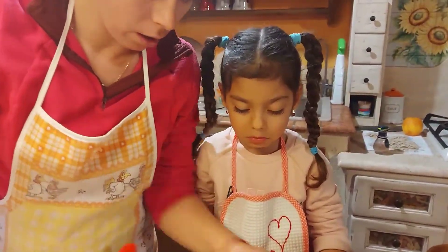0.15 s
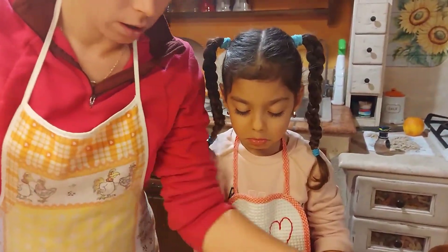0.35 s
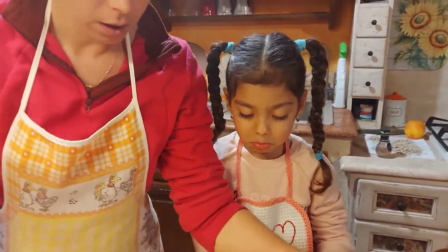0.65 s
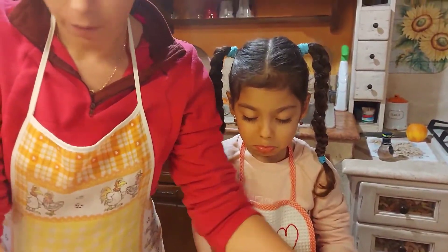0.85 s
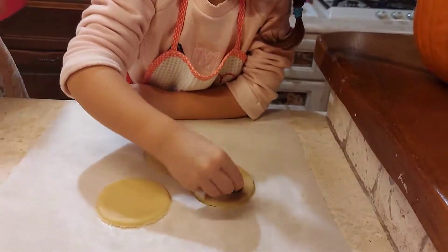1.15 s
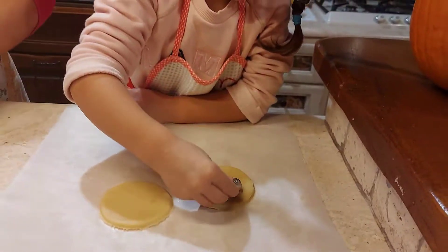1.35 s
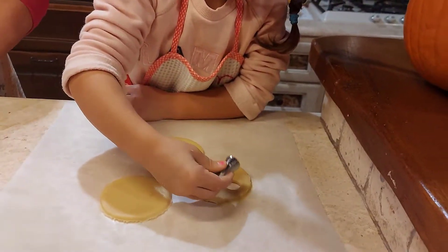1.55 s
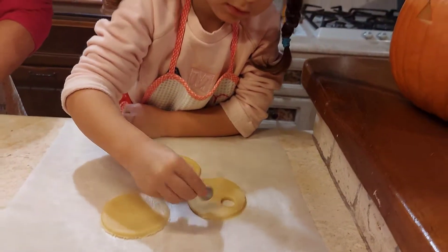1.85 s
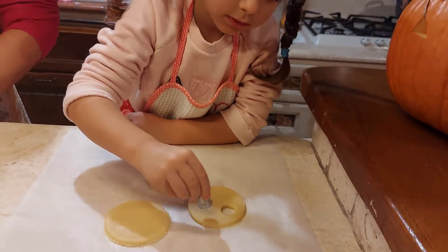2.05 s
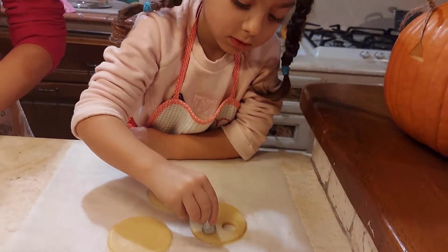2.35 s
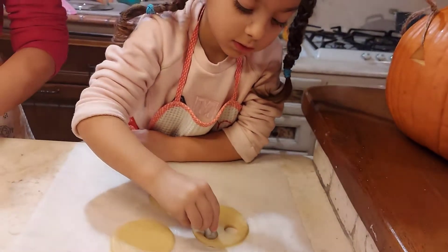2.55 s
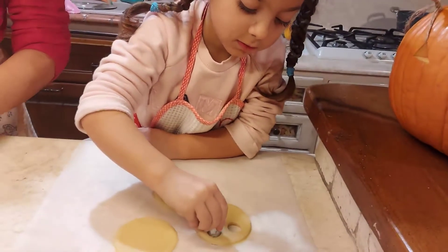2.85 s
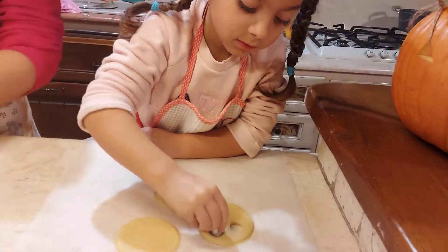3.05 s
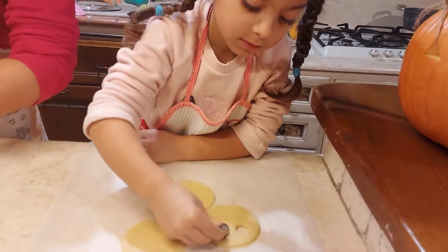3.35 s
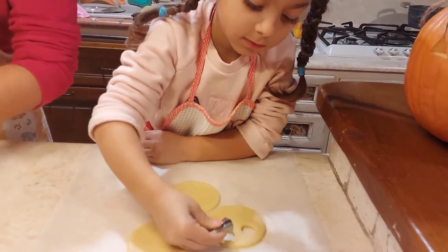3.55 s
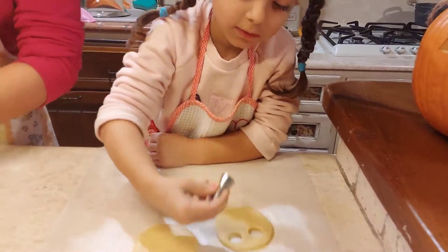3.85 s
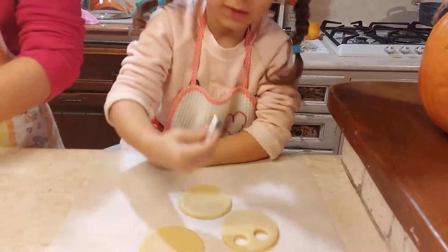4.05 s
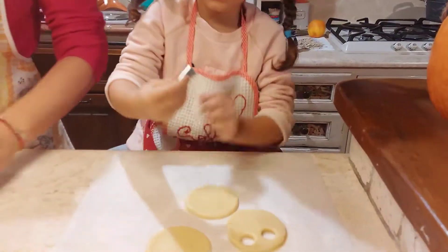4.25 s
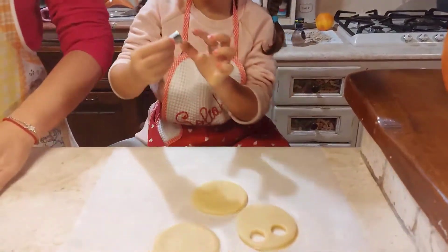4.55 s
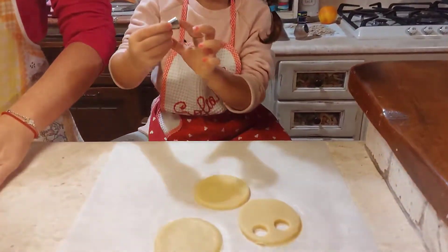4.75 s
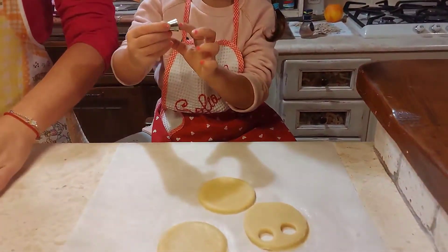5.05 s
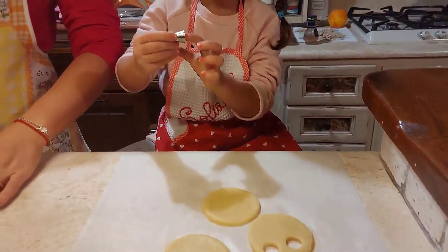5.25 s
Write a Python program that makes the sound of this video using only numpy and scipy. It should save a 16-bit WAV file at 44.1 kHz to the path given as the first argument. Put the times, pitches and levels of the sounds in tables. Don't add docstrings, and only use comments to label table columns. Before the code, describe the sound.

A quiet indoor kitchen with a low appliance hum and faint hiss, heard close in stereo with a short room ring. A soft touch at 0.37 s precedes a loud, hard, bouncing knock at 0.49 s with a counter thud and brief paper scrape. From 0.6 to 1.3 s baking paper slides loudly, bright and hissy, with dense sharp crackles strongest around 0.75 and 0.92 s, a dry drone near 1.25 s and creaking board. At 1.33 s it cuts suddenly to a softer scene: a dull push at 1.4 s, tiny hard taps from 1.5 to 1.9 s, and crisp rustles around 1.9-2.2 s. It is nearly still until 2.9 s, when low bumps begin, firmer near 3.45 s. Short paper sweeps come at 3.5, 3.8 and 4.0 s, a quiet knock at 4.18 s, rustling and a thump around 4.45 s, a snap at 4.6 s, then small ticks and another low push near 4.9 s.

```python
import sys
import numpy as np
from scipy import signal
from scipy.fft import rfft, irfft
from scipy.io import wavfile
from scipy.ndimage import uniform_filter1d

SR = 44100
rng = np.random.default_rng(int(sys.argv[2]) if len(sys.argv) > 2 else 0)


def attenuation_scalar(level_db):
    decades = np.asarray(level_db, float) / 20
    return 10 ** decades


def to_wav(sig):
    pcm = np.clip(np.atleast_2d(sig), -1, 1) * 32767
    pcm = np.round(pcm).astype(np.int16)
    wavfile.write(sys.argv[1], SR, pcm.T)


N = 237875
T = np.arange(N) / SR
SCENE_CHANGE_S = 1.328
STEP = 16

# pitch_hz, level_db per Hz
KITCHEN_SPECTRUM = [(15, -50.5), (25, -38), (86, -13), (134, -11.5), (167, 4), (189, -15), (220, -10.5),
                    (253, -15.5), (282, -5.5), (428, -19), (492, -30), (556, -16.5), (1000, -55),
                    (1300, -80), (2200, -120)]
# pitch_hz, level_db
APPLIANCE_TONES = [(755, -90), (513, -95)]
# pitch_hz, level_db per Hz
MIC_SPECTRUM = [(530, -33), (900, -8), (1260, -14), (1440, -10.5), (6990, -20), (12400, -8.5),
                (15800, -15.5)]
# pitch_hz, likeness (0 to 1)
LEFT_RIGHT_LIKENESS = [(25, .9), (60, .985), (150, .985), (300, .75), (600, .35), (1200, .3), (2500, .25),
                       (15000, .2)]
# pitch_hz, time_to_fall_60db_s
ROOM_DECAY = [(100, 0.13), (1000, .4), (4000, 0.23), (15000, 0.25)]

# pitch_hz, level_db per Hz
RUMBLE_SPECTRUM = [(55, -25.5), (85, -12), (105, -9), (123, -1), (142, -12), (165, -11), (220, -17),
                   (290, -17), (390, -22), (520, -22.5), (800, -43.5)]
# pitch_hz, level_db per Hz
FLOOR_SPECTRUM = [(18, -33.5), (33, -15), (55, -1), (75, -2), (100, -25)]
# pitch_hz, level_db per Hz
CREAK_SPECTRUM = [(400, -23), (600, -9.5), (720, 0.5), (830, -4.5), (960, -8.5), (1120, -10), (1500, -31)]
# peak_s, rumble_db, creak_db, floor_thud_db, fall_20db_s
LEAN_EVENTS = [(.094, -48, -90, -79, -0.07), (.32, -59, -83, -79, 0.04), (.43, -44, -54, -67, 0.14),
               (0.789, -42.5, -43, -70, 0.13), (.88, -55, -69, -64, .3), (1.12, -50, -52, -72, 0.44),
               (1.24, -46.5, -57, -70, 0.02), (1.28, -51, -44, -69, 0.14), (1.37, -56.5, -62, -90, 0.23),
               (1.528, -57, -52, -82, 0.09), (1.721, -68, -52.5, -90, 0.2),
               (1.919, -53.5, -45, -83, 0.0858), (2.06, -54.5, -51, -77, .11), (2.46, -70, -97, -88, 0.5),
               (2.95, -61, -99, -51, 0.03), (3.12, -56.5, -77.5, -76, 0.56), (3.37, -52.5, -55, -63, 0.13),
               (3.47, -48, -58.5, -45.5, 0.07), (3.55, -53.5, -68, -75, 0.14), (3.78, -57, -66, -68, 0.57),
               (3.97, -52, -81.5, -71, 0.44), (4.519, -55.5, -65.5, -67, 0.19), (4.31, -52, -69, -65, 0.1),
               (4.935, -52, -72, -79, 0.15), (5.25, -56, -80, -75, .2), (1.88, -59, -60, -85, .1)]
# start_s, rumble_db, creak_db, floor_thud_db, hold_s
SHAKE_EVENTS = [
    (.4875, -42, -47.5, -65, .13),
    (4.182, -51.5, -53, -56.5, 0.047),
]
# rumble_db, creak_db, floor_thud_db
RESTING_LEVELS = [-66.5, -88, -88.5]
# start_s, peak_db, pitch_hz, cycles_to_fall_60db
PUSH_EVENTS = [
    (0.786, -61, 124, 35),
    (1.3995, -42, 335, 14.5),
    (1.4003, -58, 600, 6),
    (1.52, -57, 123, 48),
    (2.932, -51.5, 116, 41.5),
    (3.42, -44, 116, 30),
    (3.458, -45.5, 170.6, 39),
    (4.438, -43.5, 130.7, 50),
    (4.924, -49, 172.6, 42),
]

# start_s, level_db, pitch_hz, left_right_db, fall_60db_s
PING_EVENTS = [(1.345, -57, 2250, -2, .08), (1.518, -53, 705, -7, 0.078), (1.518, -45, 953, -7, 0.038),
               (1.679, -45.5, 790, 0, 0.031), (1.707, -47, 916, 3, 0.042), (1.754, -52, 2300, 5, 0.022),
               (1.855, -47, 1917, 10, 0.06), (1.914, -43, 715, 7, 0.091), (2.427, -66, 1850, -9, 0.025),
               (2.428, -63.5, 2540, -5.5, 0.036), (2.457, -66, 1900, -1, 0.023),
               (2.457, -75, 2480, -2.5, 0.037), (2.273, -57.5, 3180, -0.5, 0.047),
               (1.699, -48, 800, 2, .025), (1.72, -53, 850, 2, .03), (1.737, -52, 800, 2, .035),
               (1.5, -52, 850, -5, .03)]
# start_s, crack_db, thud_db (against crack), left_right_db, bounce_loss_db per ms, contact_ms
KNOCK_EVENTS = [
    (0.3687, -32, -12, 6.5, 1, 4),
    (0.4857, -10.5, -25, 0, 1.4, 0.74),
    (4.1839, -45, -13, -6.5, 0.5, 1.),
]
# delay_s, signed_strength (before the bounce loss)
KNOCK_BOUNCES = [
    (0, -1.),
    (.0021, -.7),
    (.0036, -.75),
    (.0056, -.3),
    (.0072, .45),
    (.0112, -.3),
    (.014, -1.1),
    (0.0176, .9),
    (.025, -1.5),
]
# pitch_hz, level_db, fall_60db_s
COUNTER_MODES = [(81, -10.5, 0.31), (98, -12.5, 0.29), (116, -10, 0.29), (122.7, 1, 0.6), (165, -10, .25),
                 (179, -14, 0.2), (240, -11, 0.18), (295, -8, .25), (332.4, -9.5, 0.25), (372, -8, 0.32),
                 (392, -4.5, 0.33), (453, -9, 0.35), (569, -11.5, .25), (660, -11, 0.11)]
# pitch_hz, level_db, fall_60db_s, left_right_db
FACE_MODES = [(890, -4.5, .025, -5), (1070, -5, .025, 0), (1220, -10, .015, 4), (1350, -13, 0.012, 6),
              (1530, 0, .014, 8), (1800, 1, 0.012, 6), (1950, -3.5, .012, 2), (2250, -4, .012, -0.5),
              (2678, -5, .008, -5), (3136, -7, .01, -5), (4130, -14, .008, -3), (4680, -17, 0.05, 4),
              (6500, -17, .006, -1)]

# start_s, peak_db, centre_hz, left_right_db
DRAG_FOLDS = [(.3364, -58, 11200, 4.5), (.4475, -35, 7000, 3.5), (.4685, -41, 9000, -3.5),
              (.7165, -24, 4900, -6.5), (.7328, -24, 8930, -7.5), (.7506, -19, 8350, -3),
              (.7645, -18.5, 11000, 0), (.788, -23.5, 8400, 0), (.82, -27, 10500, -1),
              (.8408, -26.5, 8510, 7), (.87, -29, 10000, -0.5), (.9158, -14, 8120, 7),
              (.9187, -16, 8120, 2.5), (.965, -27, 12000, 0.5), (.9465, -25, 8540, -2.5),
              (1.0068, -22.5, 12100, -2), (1.0274, -21, 4070, 6.5), (1.1316, -27.5, 3500, 0),
              (1.1675, -21, 12000, 0), (1.2095, -26, 3500, -1), (1.277, -21.5, 12000, .5),
              (1.2965, -21, 3300, -5), (.6076, -30, 4700, 1.5), (.6151, -30, 8140, 1.5),
              (.6859, -41, 4610, 1), (.755, -25, 9500, 0), (.759, -25, 12000, 0), (.776, -27, 10000, 0),
              (.7835, -29, 12000, 0), (.8346, -27, 6000, 1.5), (.85, -27, 8500, 0), (1.0, -27, 11000, 0),
              (1.013, -26, 4600, 0), (1.02, -26, 12000, 0), (1.072, -28, 6000, 1.5), (1.112, -27, 3500, 0),
              (1.136, -29, 8300, 0), (1.255, -25, 8300, 0)]
# start_s, peak_db, centre_hz, left_right_db
HAND_FOLDS = [(1.5182, -37, 3620, 6), (1.6242, -43.5, 10400, 7), (1.6792, -53.5, 5770, 5),
              (1.7055, -53, 2750, 2), (1.7542, -43, 8500, 6), (1.8545, -38, 7900, 6),
              (1.9112, -28.5, 12800, 5), (1.956, -34.5, 11800, 1.5), (2.019, -34, 5530, 3),
              (2.038, -32, 4400, 0), (2.0632, -28, 7760, 5), (2.0751, -27.5, 7500, 5.5),
              (2.1585, -39, 8350, 8.5), (2.3542, -49.5, 8140, 7), (2.8439, -65, 11230, -1.5),
              (3.3233, -55.5, 8120, -4), (3.0447, -63.5, 8560, -1.5), (3.217, -60, 5000, 2),
              (3.3426, -51.5, 8210, 4.5), (3.465, -47, 8500, 0), (3.7047, -56, 8800, 5),
              (2.098, -41, 8000, 5), (3.358, -42.5, 9120, 5), (3.4126, -47, 8490, 7),
              (3.7362, -52, 11600, 5), (4.4313, -40, 8500, -1), (4.4524, -38, 8300, 11),
              (4.5949, -33, 11200, 3.5), (4.8853, -61, 10170, -1), (4.9267, -48, 11000, 7),
              (4.9876, -43.5, 8500, 0.5), (4.988, -46, 3790, 2), (5.006, -43.5, 9580, 5.5),
              (5.0557, -39.5, 11670, 0), (5.1974, -41, 8700, 4.5), (2.168, -40.5, 9000, 7),
              (1.36, -46, 6000, 2), (1.499, -46, 4000, 4), (1.845, -54, 7500, 3), (2.232, -51, 8200, 2.5),
              (4.4176, -54, 8470, 0), (5.1534, -54, 8000, 1.5), (5.18, -54, 8430, 5),
              (5.2447, -43, 3910, 1.5), (5.199, -43, 4800, 3), (4.603, -38, 5500, 2)]

# pitch_hz, level_db per Hz
HISS_SPECTRUM = [(1410, -45.5), (2400, -17), (3140, -10.5), (3700, -9.5), (4230, 0.5), (6800, -3),
                 (7800, -2), (8400, .5), (9100, -2.5), (10000, -3), (12200, -2), (15300, -5),
                 (15800, -21.5)]
# pitch_hz, level_db per Hz
BODY_SPECTRUM = [(220, -17.5), (400, -9.5), (900, -10), (1500, -6), (2200, -7), (3000, -8), (4200, -12)]
# pitch_hz, level_db per Hz
BOW_SPECTRUM = [(1200, -24.5), (1600, -5.5), (2000, 0), (2500, -1.5), (3200, -5.5), (4000, -19.5)]
# start_s, hiss_db, hold_s, fall_20db_s, body_db (against hiss)
JERK_EVENTS = [(.3688, -58, 0.004, .02, 2), (0.371, -69, 0.055, .03, 2), (4.4455, -41.5, .022, .02, -13),
               (4.415, -60, .015, .05, -15), (.455, -60, 0.032, -5, -23), (3.712, -61.5, 0.036, 0.36, -11),
               (3.957, -59, .03, -0.3, -12.5), (3.417, -57, 0.06, .1, -1.5), (0.485, -47, .012, 0.1, 17),
               (0.493, -37, 0.14, .03, -8), (.749, -30.5, 0.035, 0.46, -11), (0.912, -34, 0.017, 0.4, -12),
               (1.328, -49, 0.0067, 0.15, -4.5), (1.622, -60.5, .003, 0.35, -9),
               (1.853, -51, 0.098, 0.0445, 0), (1.911, -48, .012, .06, -4),
               (2.157, -48.5, .015, 0.0254, -16), (2.1635, -58, .19, 0.06, -15.5),
               (4.181, -54, 0.012, .14, 1), (4.433, -52, .07, 0.14, -8.5), (4.595, -47, 0.008, 0.04, -21),
               (4.591, -53.5, 0.013, 0.17, -9.5), (4.64, -70.5, 0.061, 0.08, 5.5),
               (5.056, -62, 0.01, 0.07, -34), (5.203, -57, 0.062, .09, -16.5)]
# peak_s, hiss_db, rise_20db_s, fall_20db_s, body_db (against hiss)
STROKE_EVENTS = [(.24, -79.5, .6, 0.1, -6), (.342, -62, .07, .03, -22), (.62, -35, 0.11, .03, -11.5),
                 (.738, -36.5, 0.1023, 0.4, -13), (1.522, -49, 0.05, .08, -1.4), (1.49, -60, .06, .05, -3),
                 (1.72, -65.5, -0.4, 0.57, 1.7), (2.071, -42.5, 0.06, 0.0764, -9),
                 (2.035, -47, 0.045, .05, -7), (3.21, -66, 0.18, 0.3, -16), (2.92, -76.5, .25, 2.3, -9.5),
                 (3.42, -57.5, 0.2241, 0.15, -1.66), (3.62, -69, 0.4, 0.3, -9.5),
                 (1.16, -30, 0.36, 1.0, -6.5), (1.269, -38.5, 0.1624, -1.2, 1),
                 (4.294, -51.5, 0.1, 0.06, -10.5), (4.458, -46, .035, 0.06, -15.5),
                 (4.935, -57, 0.03, 0.15, -9), (5.01, -61, 0.1, 0.05, -6), (5.165, -66, 0.06, 0.1, -22)]
# peak_s, hiss_db, rise_20db_s, fall_20db_s, body_db (against hiss)
SWEEP_EVENTS = [
    (3.52, -47.5, 0.1, 0.064, -14),
    (3.575, -63, 0.06, .1, -11.5),
    (3.798, -48.5, 0.09, 0.07, -12.5),
    (4.005, -44, .05, .05, -13.5),
    (4.055, -43, .06, .07, -11),
    (4.12, -57.5, 0.08, 0.08, -9),
]
# start_s, level_db, rise_20db_s, hold_s, fall_20db_s
BOW_EVENTS = [
    (1.145, -43.5, .04, 0.026, -0.55),
    (1.233, -46, 0.03, .01, -0.35),
    (1.259, -41, 0.04, 0.029, 0.24),
    (3.498, -59, -0.01, 0.01, 0.12),
    (4.001, -58.5, -0.08, 0.085, 0.04),
    (1.344, -68, 1.2, 0.013, 0),
    (.37, -62, 0, .05, .3),
]
JERK_RISE_S = .0012
RESTING_DB = -96


def rms_one(x):
    return x / np.sqrt(np.mean(x ** 2) + 1e-20)


def at_hz(points, hz):
    table = np.array(points)
    return np.interp(np.log(hz), np.log(table[:, 0]), table[:, 1])


def panned(db):
    return attenuation_scalar(np.array([db / 2, -db / 2]))


def lead(x, left_first_s):
    return np.array([x[0], np.roll(x[1], round(left_first_s * SR))])


def drift(rate):
    r = np.exp(-40 * np.pi * rate / SR)
    noise = rng.standard_normal(N // 20 + 4002)
    slow = signal.lfilter([1], [1, -2 * r, r * r], noise)[4000:]
    return np.interp(np.arange(N) / 20, np.arange(len(slow)), rms_one(slow - slow.mean()))


def coloured(x, spectrum):
    hz = np.maximum(np.fft.rfftfreq(N, 1 / SR), 5)
    alike = np.clip(at_hz(LEFT_RIGHT_LIKENESS, hz), 0, .99)
    inside = (hz >= spectrum[0][0]) & (hz <= spectrum[-1][0])
    mid, side = rfft(x) * attenuation_scalar(at_hz(spectrum, hz)) * inside
    mid = mid * np.sqrt(1 + alike)
    side = side * np.sqrt(1 - alike)
    return rms_one(irfft(np.array([mid + side, mid - side]), N))


def gesture(s, rise_s, hold_s, fall_s, roundness=1):
    t = T[::STEP]
    before = (s - t) / max(rise_s, 1e-4)
    after = np.maximum(t - s - max(hold_s, 0), 0) / max(fall_s, 1e-3)
    away = np.maximum(before, after)
    same_scene = (t < SCENE_CHANGE_S) == (s < SCENE_CHANGE_S)
    return attenuation_scalar(np.maximum(-20 * away ** roundness, -150)) * same_scene


def mixed(levels_db, gains, rest_db):
    moving = attenuation_scalar(levels_db).T ** 2 @ np.array(gains) ** 2
    slow = np.sqrt(moving + attenuation_scalar(np.array(rest_db))[:, None] ** 2)
    return [np.interp(T, T[::STEP], column) for column in slow]


def ring(clicks, hz, t60):
    r = attenuation_scalar(-60 / max(t60 * SR, 9))
    w = 2 * np.pi * hz / SR
    return signal.lfilter([0, np.sin(w)], [1, -2 * r * np.cos(w), r * r], clicks + 1e-18)


def fibres(per_s, spread_db, clump_db, smooth):
    born = rng.random(N) < per_s / SR
    size = attenuation_scalar(spread_db * np.minimum(rng.exponential(1, N), 4)) * born
    fade = np.exp(-np.arange(200) / 30)
    slips = np.convolve(size, fade)[:N] * rng.standard_normal((2, N))
    clumps = attenuation_scalar(clump_db * (.3 * drift(12) + drift(45)))
    return clumps * (rms_one(slips) + smooth * rng.standard_normal((2, N)))


def mottled(x, depth_db, wide, lasting):
    _, _, z = signal.stft(x, nperseg=256)
    field = rng.standard_normal((3,) + z.shape[1:])
    for _ in range(2):
        field = uniform_filter1d(field, size=wide, axis=1)
        field = uniform_filter1d(field, size=lasting, axis=2)
    field = rms_one(field[:2] + field[2])
    return rms_one(signal.istft(z * attenuation_scalar(depth_db * field), nperseg=256)[1][:, :N])


def kitchen():
    tones = sum(attenuation_scalar(db + 1 + 2.0 * drift(1.5)) * np.sin(2 * np.pi * hz * T) for hz, db in APPLIANCE_TONES)
    uneven = attenuation_scalar(2.0 * drift(6.9)) * rng.standard_normal((2, N))
    murmur = attenuation_scalar(-63) * coloured(uneven, KITCHEN_SPECTRUM)
    hiss = attenuation_scalar(-79.5) * coloured(rng.standard_normal((2, N)), MIC_SPECTRUM)
    return murmur + tones + hiss


def room(x):
    t, tail = T[:SR // 2], 0
    for hz in 90 * 2. ** np.arange(8):
        band = signal.butter(2, [hz * .7, hz * 1.41], "band", fs=SR, output="sos")
        mid, side = signal.sosfilt(band, rng.standard_normal((2, len(t))))
        side = side * np.sqrt(1 - np.clip(at_hz(LEFT_RIGHT_LIKENESS, hz), 0, 1))
        tail = tail + np.array([mid + side, mid - side]) * attenuation_scalar(-60 * t / at_hz(ROOM_DECAY, hz))
    tail = tail * np.clip(t / 0.0013, 0, 1)
    tail = tail / np.sqrt(np.sum(tail ** 2) / 2)
    before = T < SCENE_CHANGE_S
    wet = [signal.fftconvolve(x * part, tail, axes=1)[:, :N] for part in (before, ~before)]
    return np.where(before, *wet)


def lean():
    gains = [gesture(row[0], .8 * row[-1], 0, row[-1]) for row in LEAN_EVENTS]
    gains += [gesture(row[0], JERK_RISE_S, row[-1], fall_s=0.086) for row in SHAKE_EVENTS]
    levels_db = np.array(LEAN_EVENTS + SHAKE_EVENTS)[:, 1:-1]
    shake, strain, thud = mixed(levels_db, gains, RESTING_LEVELS)
    rumble = coloured(attenuation_scalar(2 * drift(14)) * rng.standard_normal((2, N)), RUMBLE_SPECTRUM)
    floor = coloured(attenuation_scalar(3.2 * drift(8)) * rng.standard_normal((2, N)), FLOOR_SPECTRUM)
    creak = coloured(fibres(per_s=180.0, spread_db=0, clump_db=2.0, smooth=1.6), CREAK_SPECTRUM)
    return attenuation_scalar(-3.0) * shake * rumble + attenuation_scalar(-3.5) * strain * creak + attenuation_scalar(-2.0) * thud * floor


def pushes():
    out, t = np.zeros(N), T[:8000]
    for s, db, hz, cycles in PUSH_EVENTS:
        rise = 1 - np.exp(-t * hz * 3.3)
        fall = attenuation_scalar(-60 * t * hz / cycles)
        out[round(s * SR):][:8000] += attenuation_scalar(db + 0.5) * rise * fall * np.sin(2 * np.pi * hz * t)
    return out


def pings():
    out, t = np.zeros((2, N)), T[:6000]
    noises = rng.standard_normal((len(PING_EVENTS), 2, 6000))
    for (s, db, hz, pan_db, t60), rough in zip(PING_EVENTS, noises):
        blur = 1 + 10.6 * uniform_filter1d(rough, size=150)
        fall = attenuation_scalar(db - 60 * t / max(t60, .004))
        wave = fall * (1 - np.exp(-t * 900)) * np.sin(2 * np.pi * hz * t)
        out[:, round(s * SR):][:, :6000] += blur * wave * panned(pan_db)[:, None]
    return out


def knocks():
    crack, thud = np.zeros((2, N)), np.zeros(N)
    for s, db, thud_db, pan_db, loss_db, contact_ms in KNOCK_EVENTS:
        push = np.hanning(max(round(contact_ms * SR / 1000), 3))
        thud[round(s * SR):][:len(push)] = attenuation_scalar(db + thud_db) * push / push.sum()
        edge = np.exp(-np.arange(60) / (.018 * len(push))) * np.arange(1, 61)
        for late, strength in KNOCK_BOUNCES:
            hit = strength * attenuation_scalar(db - 6.5 - 1000 * late * loss_db) * panned(pan_db)
            crack[:, round((s + late) * SR):][:, :len(edge)] += hit[:, None] * edge / edge.sum()
    face = sum(panned(pan_db)[:, None] * attenuation_scalar(db) * ring(crack, hz, t60) for hz, db, t60, pan_db in FACE_MODES)
    face = lead(face, -.00003)
    face = signal.sosfilt(signal.butter(2, 750, "high", fs=SR, output="sos"), face)
    counter = 0
    for hz, db, t60 in COUNTER_MODES:
        side = panned(-2.5 * np.log2(hz / 100))[:, None]
        counter = counter + side * np.sign(200 - hz) * attenuation_scalar(db) * ring(thud, hz, t60)
    return face, counter


def snaps():
    out, t = np.zeros((2, N + 4000)), np.arange(4000) / SR
    bright = signal.butter(6, 3900, "high", fs=SR, output="sos")
    fall = attenuation_scalar(-60 * t / 0.024)
    rows = DRAG_FOLDS + HAND_FOLDS
    for (s, db, hz, pan_db), noise in zip(rows, rng.standard_normal((len(rows), 2, 4000))):
        edges = [hz * 0.82, min(hz * 1.35, 19000)]
        own = signal.sosfilt(signal.butter(2, edges, "band", fs=SR, output="sos"), noise * fall)
        tick = signal.sosfilt(bright, noise * (.65 * fall + 2.0 * fall ** 4))
        tick_share = 2.0 * min(hz / 8000, 1)
        burst = own / np.abs(own).max() + tick_share * tick / np.abs(tick).max()
        at = round(s * SR)
        out[:, at:at + 4000] += attenuation_scalar(db + 0.6) * burst * panned(np.clip(pan_db, -7, 7))[:, None]
    return out[:, :N]


def slide():
    gains = [gesture(s, JERK_RISE_S, hold, fall) for s, _, hold, fall, _ in JERK_EVENTS]
    gains += [gesture(s, rise, 0, fall) for s, _, rise, fall, _ in STROKE_EVENTS]
    gains += [gesture(s, rise, 0, fall, roundness=2.34) for s, _, rise, fall, _ in SWEEP_EVENTS]
    rows = JERK_EVENTS + STROKE_EVENTS + SWEEP_EVENTS
    levels_db = np.array([(row[1], row[1] + row[-1]) for row in rows])
    hiss, body = mixed(levels_db, gains, [RESTING_DB, RESTING_DB - 3.5])
    bow_gains = [gesture(s, *shape) for s, _, *shape in BOW_EVENTS]
    bow, = mixed(np.array(BOW_EVENTS)[:, 1:2], bow_gains, [RESTING_DB - 20.5])
    rough = fibres(per_s=1200.0, spread_db=3.4, clump_db=1.3, smooth=1.7)
    rough = mottled(rough, depth_db=1.5, wide=2, lasting=8)
    sheet = hiss * coloured(rough, HISS_SPECTRUM) + body * coloured(rough, BODY_SPECTRUM)
    sheet = sheet + bow * coloured(rough, BOW_SPECTRUM)
    return lead(sheet, .00036) * panned(0.75)[:, None]


def scene():
    creases, rings, (face, thud) = snaps(), pings(), knocks()
    wet = room(attenuation_scalar(-10.0) * creases + attenuation_scalar(-11.0) * rings + attenuation_scalar(-7.0) * face + attenuation_scalar(3.0) * thud)
    return kitchen() + wet + lean() + pushes() + rings + face + thud + creases + slide()


def low_pass(x):
    return signal.sosfilt(signal.butter(12, 16640, fs=SR, output="sos"), x)


def record(dry):
    mix = signal.sosfilt(signal.cheby2(10, 45, 16600, fs=SR, output="sos"), dry)
    mix = signal.sosfilt(signal.butter(2, 35., "high", fs=SR, output="sos"), mix)
    return low_pass(mix)


dry = scene()
out = record(dry)
to_wav(out)
```